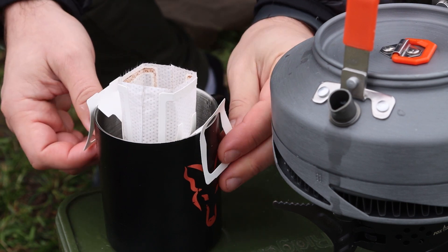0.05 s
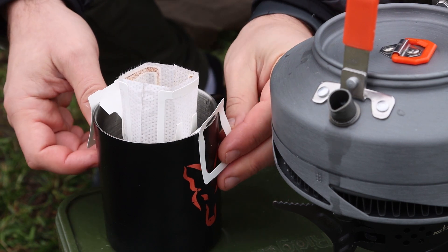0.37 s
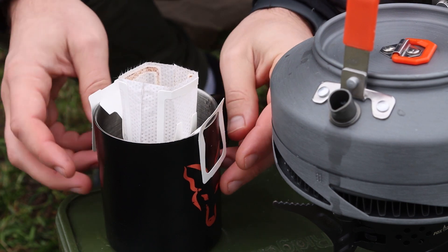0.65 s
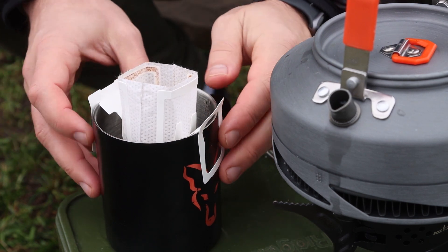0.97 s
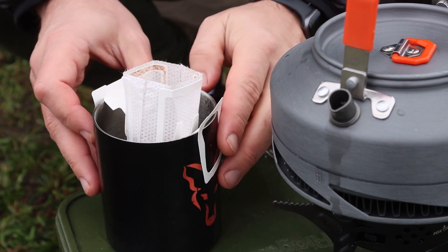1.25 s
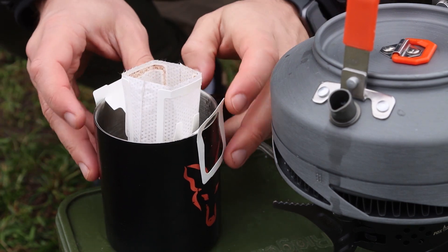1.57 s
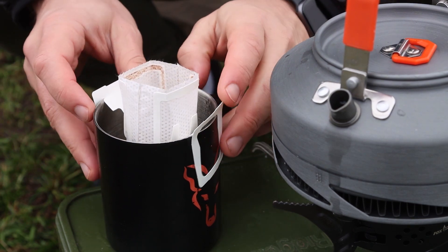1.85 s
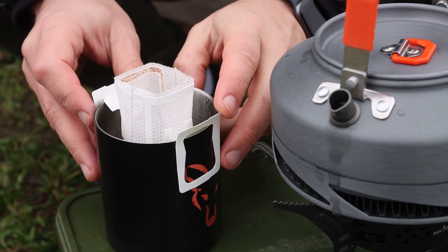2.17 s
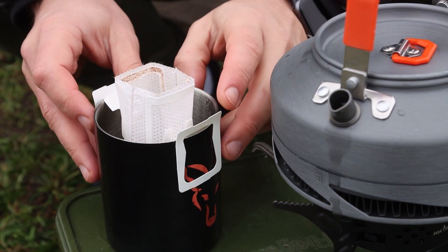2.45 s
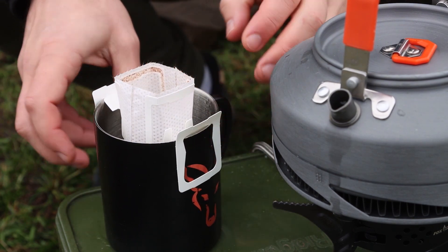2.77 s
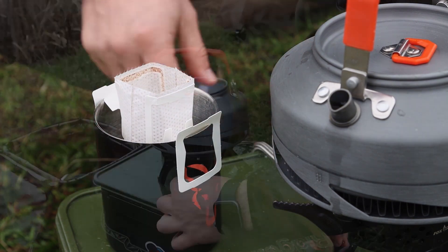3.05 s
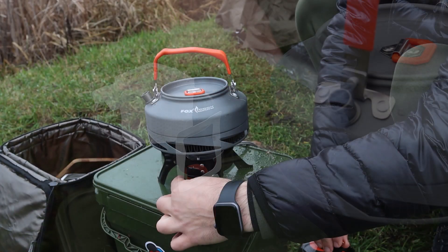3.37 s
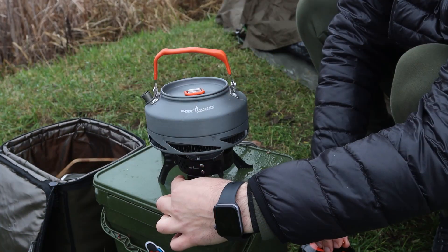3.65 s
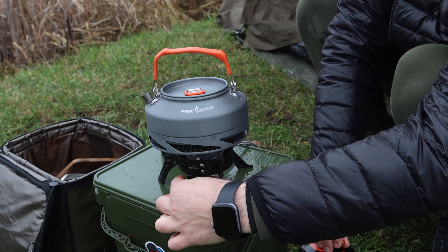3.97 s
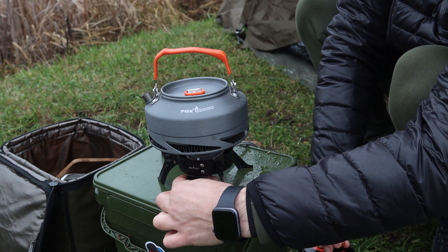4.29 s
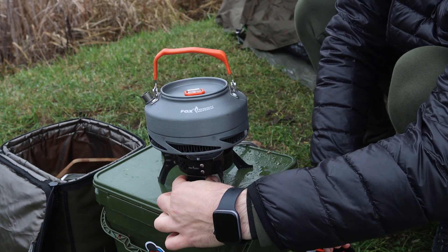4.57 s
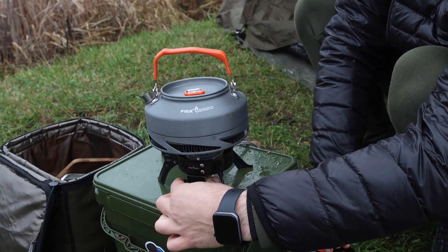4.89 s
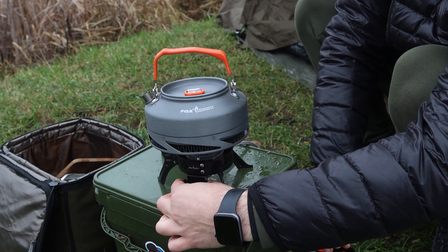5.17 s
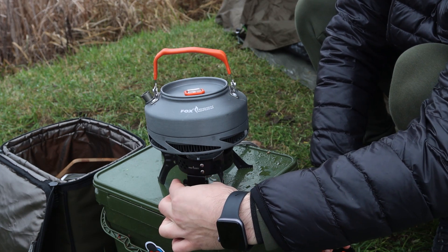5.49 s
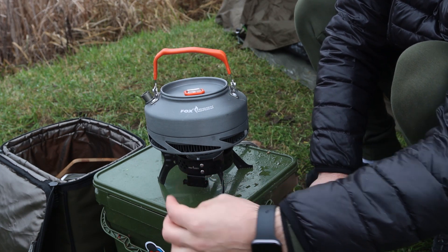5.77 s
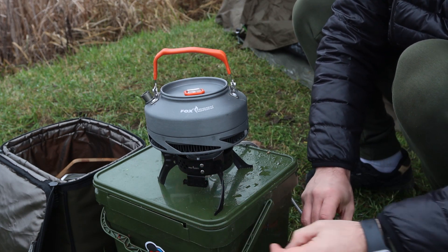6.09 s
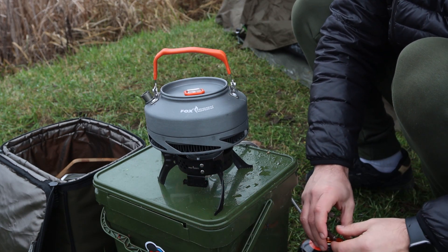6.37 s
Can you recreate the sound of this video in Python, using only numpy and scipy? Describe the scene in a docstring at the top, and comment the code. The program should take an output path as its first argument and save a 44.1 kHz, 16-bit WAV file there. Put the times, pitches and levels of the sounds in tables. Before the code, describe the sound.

A light breeze rumbles faintly on the microphone outdoors, over a distant hum. During the first two seconds, fingers softly brush a paper coffee filter and a steel mug knocks lightly on a plastic lid. At about 0.6 seconds the filter's hook snaps over the rim, which rings briefly. A nylon swish grows from 2.6 seconds and cuts off at 3. A camping stove's valve then opens, and a thin, whistling gas hiss builds until about 4 seconds. A soft, low thump precedes the igniter's sharp metallic snap at 4.5 seconds, the loudest sound. The gas catches at once with a soft, low pop, and the button releases with a smaller click. From there the flame roars steadily under a kettle, flaring in the draught. Around 5.6 to 6 seconds it is turned up, growing slightly louder and fizzier, and burns until the end at about 6.6 seconds.

```python
"""Outdoors, a light breeze blows over a faint, far hum. A steel mug knocks on a plastic lid while
fingers brush a paper coffee filter and snap its hook over the rim. A nylon swish grows and cuts off.
Then a camping stove's valve opens, and gas hisses through the mixing tube and whistles in the burner.
A soft, low thump comes just before the piezo igniter snaps, and the gas catches with a soft pop.
The flame roars under a kettle, flaring in the draught, and near the end it is turned up."""
import sys
import numpy as np
from scipy import signal
from scipy.fft import rfft, irfft, next_fast_len
from scipy.io import wavfile
from scipy.ndimage import map_coordinates

SR = 44100
rng = np.random.default_rng(int(sys.argv[2]) if len(sys.argv) > 2 else 0)


def persist_wave(psi):
    """Save psi, clipped to +-1, as 16-bit WAV."""
    counts = np.round(np.clip(psi, -1, 1) * 32767).astype(np.int16)
    wavfile.write(sys.argv[1], SR, np.atleast_2d(counts).T)


N = 292383
TIME = np.arange(N) / SR
AGE = np.arange(SR // 2) / SR  # seconds since a blow

# Tone of the outdoor air: pitch_hz, level_db
AIR_SPECTRUM = [(25, 3.5), (100, 7), (250, 2), (400, -3), (650, -2.5), (1200, -6.5), (2500, -12.5),
                (5000, -15.5), (10000, -19), (15500, -20.5)]
# Far hums: start_s, end_s, pitch_hz, level_db
FAR_HUMS = [(0, 3.0, 210, -73.5), (3.0, 3.79, 106.7, -67)]
# Gusts on the microphone: peak_s, width_s, level_db
WIND_GUSTS = [(.37, 0.33, -60), (.78, 0.37, -60.5), (1.254, 0.16, -53), (1.753, 0.46, -55),
              (2.427, 0.29, -61), (2.78, 0.14, -58)]
# Dull knocks and soft, low thumps: start_s, level_db, boom_db, tick_db
DULL_KNOCKS = [(.002, -58.5, -1, -20), (.185, -61, -16, 0), (0.242, -57, -16, 7.5), (.593, -54.5, -14, 5),
               (1.158, -61.5, 2.5, -20), (1.5257, -53, 5, -23), (4.145, -59, 7.5, -20),
               (4.486, -44.5, 6.5, -17), (4.716, -38.5, 0.5, -10)]
# Tone of a dull knock: pitch_hz, level_db
KNOCK_SPECTRUM = [(25, -32), (80, -5), (220, -9), (450, -3.5), (720, 0.5), (1100, -13.5), (2400, -22),
                  (4000, -29), (12000, -39.5)]
# Notes of the low boom under a knock: pitch_hz, level_db, fade_s
BOOM_NOTES = [(161.6, -2.5, 0.27), (190.4, -2.5, 0.11), (263, -7.5, 0.15), (744, -22, .1), (874, -19, .1)]
# Notes of a light tap on the mug: pitch_hz, level_db, fade_s
TICK_NOTES = [(422, -9.5, 0.025), (715, -0.5, .05), (1350, -9, 0.0252), (1745, -10, 0.031),
              (2510, -5, 0.027)]
# Fingers brush the paper: peak_s, width_s, level_db
FINGER_BRUSHES = [(.13, 0.046, -71.5), (.2, 0.031, -66.5), (0.666, 0.06, -69), (1.053, .05, -71),
                  (1.16, 0.074, -68.5), (1.33, 0.059, -69.5), (1.514, 0.023, -70), (1.716, .05, -71.5),
                  (1.85, .05, -70.5), (1.99, 0.081, -70.5)]
# Tone of rubbed paper: pitch_hz, level_db
RUB_SPECTRUM = [(200, -35), (600, 9), (1200, -7), (3000, -5.5), (6000, -11), (8000, -4), (10000, -10),
                (13000, -23)]
# The paper hook snaps onto the rim: start_s, level_db
HOOK_SNAPS = [(.5795, -37.5), (0.592, -44), (0.597, -31), (.618, -46)]
# Tone of snapping paper: pitch_hz, level_db
SNAP_SPECTRUM = [(150, -14), (400, -8), (1200, 1), (2400, 4), (4500, -0.5), (5900, -4.5), (7500, 3.5),
                 (10000, 4), (12500, -8), (15500, -5)]
# Notes of the mug's steel rim: pitch_hz, level_db, fade_s
RIM_NOTES = [(364, -3, 0.11), (1620, -19, .05), (2640, -9, .05), (4600, 2, 0.055), (6928, 0, 0.11),
             (8414, -7, .05), (9050, 2, 0.048)]
# Tone of sliding nylon: pitch_hz, level_db
NYLON_SPECTRUM = [(200, -18), (600, -5.5), (1150, 0.5), (2100, -2), (4400, -6.5), (5900, -19),
                  (7200, -13.5), (9000, -16), (12000, -29), (16000, -36)]
# Where the mixing tube sings: pitch_hz, width_hz, level_db
TUBE_BANDS = [(1126, 295, -3), (1740, 152.5, -5.5), (2186, 224, 1), (2890, 273, -2.5), (3276, 300, 1.5),
              (4280, 280, -8), (4970, 150, -10), (5596, 280, -10), (6700, 400, -16.5), (8400, 400, -10)]
# The igniter button takes up slack, trips its spring, strikes, bounces, is let go and bounces again:
# start_s, level_db, ring_db, clatter_db
IGNITER_CLICKS = [(4.342, -54.5, -5, -5), (4.4861, -11, -21, -20.5), (4.4871, -7.5, -2.5, -20.5),
                  (4.4893, -16, -13, -28), (4.7094, -35, -1, -6), (4.7116, -35, 0.5, -12)]
# Tone of the hammer's crack: pitch_hz, level_db
CRACK_SPECTRUM = [(25, -36.5), (120, -20), (700, -14.5), (1700, -4.5), (3000, -3), (4500, 8.5), (5800, -16),
                  (6800, 3), (9200, 0), (10300, -11.5), (14500, -9), (16500, -17)]
# Short, bright notes of stove body and kettle: pitch_hz, level_db, fade_s
STOVE_NOTES = [(780, -17, .06), (1070, -23, .08), (1700, -15, .1), (2158, -18, .1), (2525, -21, .07),
               (2940, -12, .04), (3850, -8, .03), (4093, -4, .036), (4764, -2, .036), (5230, -16, .05),
               (6650, -4, .025), (6970, -6, .045), (7143, -4, .035), (7467, -6, .035), (7925, -3, .035),
               (8520, -8, .03), (8810, -3, .028), (9150, -4, .022), (12620, -13, .025), (14300, -16, .025)]
# Notes on which the kettle rings on faintly: pitch_hz, level_db, fade_s
KETTLE_NOTES = [(1070, -5, 0.33), (1390, -1, 0.28), (1675, 0.5, .15), (2158, 1, .2), (2890, -3, 0.45),
                (3130, -3.5, .35)]
# Tone of the clatter off nearby things: pitch_hz, level_db
SCATTER_SPECTRUM = [(25, -29.5), (100, -6.5), (200, 5), (500, -0.5), (1700, 7.5), (3000, 3.5), (4800, 2),
                    (5900, -8), (7200, -2.5), (9200, -10), (10500, -18), (15000, -22)]
# Tone of the flame's low roar: pitch_hz, level_db
ROAR_SPECTRUM = [(25, -46), (60, -16), (115, -6), (165, -1.5), (260, -4.5), (330, -1), (400, -5), (550, 3),
                 (650, -3), (810, 2), (970, -15), (1120, -9), (1500, -20), (2300, -18), (2650, -29.5),
                 (8000, -56.5)]
# Tone of the flame's high fizz: pitch_hz, level_db
FIZZ_SPECTRUM = [(1000, 0.5), (2200, -8), (3000, -3), (3900, 3), (4650, 5), (6100, -14.5), (6800, -5),
                 (9000, -9), (12000, -21), (16000, -41)]
# Where the burner's small holes sing: pitch_hz, width_hz, level_db
PORT_BANDS = [(1250, 130, 10.5), (3494, 120, -3)]
# The flame flares in the draught: peak_s, width_s, roar_rise_db, fizz_rise_db
FLAME_FLARES = [(4.80, 0.066, 3, 5), (5.028, 0.097, 3, 5), (5.15, 0.072, 3.5, 9.5), (5.293, 0.049, 4, 8),
                (5.49, 0.12, 2.5, 3), (5.729, 0.073, 4, 5), (6.054, 0.07, 3, 4), (6.383, 0.04, 4, 6),
                (6.486, 0.044, 5, 6.5), (6.569, 0.037, 2, 2.5)]

LIGHT_S = 4.549  # the gas catches
TURN_UP_S, TURN_UP_TAKES_S = 5.56, 0.51  # the valve is opened further


def amp(db):
    """Turn decibels into a number to multiply by."""
    return 10 ** (np.asarray(db) / 20)


def unit(x):
    """Scale a signal so its average strength (rms) is 1."""
    return x / np.sqrt(np.mean(x ** 2) + 1e-20)


def ramp(start_s, takes_s):
    """A steady rise from 0 to 1."""
    return np.clip((TIME - start_s) / takes_s, 0, 1)


def swell(peak_s, width_s):
    """A smooth hump of height 1."""
    return np.exp(-2 * ((TIME - peak_s) / width_s) ** 2)


def decay(fade_s):
    """A fall of 60 dB every fade_s seconds; 1 - decay gives a soft start."""
    return np.exp(-np.log(1000) * AGE / fade_s)


def wobble(rate_hz):
    """A smooth curve through rate_hz random points a second."""
    return map_coordinates(rng.standard_normal(int(N * rate_hz / SR) + 4), [TIME * rate_hz])


def noise(spectrum, size=N):
    """Noise of strength 1; the spectrum says how loud its pitches are next to each other."""
    hz, db = np.transpose(spectrum)
    padded = next_fast_len(size)
    gain = amp(np.interp(np.log(np.fft.rfftfreq(padded, 1 / SR) + 1), np.log(hz), db))
    return unit(irfft(rfft(rng.standard_normal(padded)) * gain, padded)[:size])


def narrow_noise(hz, width_hz):
    """A breathy note of strength 1: noise close to one pitch, which may move."""
    pole = np.exp(-np.pi * width_hz / SR)
    drift = signal.lfilter([1], [1, -pole], rng.standard_normal(N) + 1j * rng.standard_normal(N))
    drift = signal.sosfilt(signal.butter(2, min(2 * width_hz, SR / 4), fs=SR, output="sos"), drift)
    return unit(np.real(drift * np.exp(2j * np.pi * np.cumsum(hz) / SR)))


def resonances(bands):
    """Several steady, breathy notes at once."""
    return sum(amp(db) * narrow_noise(np.full(N, hz), width_hz) for hz, width_hz, db in bands)


def burst(spectrum, fade_s):
    """A puff of noise that starts at about strength 1 and dies away."""
    fall = decay(fade_s)
    return unit(noise(spectrum, size=len(AGE)) * fall) * np.sqrt(np.mean(fall ** 2))


def ring(notes):
    """The fading notes of a struck object, a little different at each blow."""
    total = np.linalg.norm([amp(db) for _, db, _ in notes])
    return sum(amp(db + rng.standard_normal()) * np.sin(2 * np.pi * (hz * AGE + rng.random()))
               * decay(fade_s) for hz, db, fade_s in notes) / total


def add(track, start_s, sound):
    """Mix a sound into the track at start_s."""
    room = track[max(round(start_s * SR), 0):][:len(sound)]
    room += sound[:len(room)]


def outdoors(air_db=-64, calm_db=-82, hum_width_hz=8, hum_fade_s=0.065):
    """Still air, far wavering hums and a light breeze rumbling on the microphone."""
    breeze = amp(calm_db) + sum(amp(db) * swell(s, width_s) for s, width_s, db in WIND_GUSTS)
    rumble = noise([(10, -7), (25, 7), (50, -3.5), (80, -8), (150, -36.5), (400, -41.5), (2000, -90)])
    wind = unit(rumble * amp(wobble(rate_hz=4.9)))
    hum = np.zeros(N)
    for start_s, end_s, hz, db in FAR_HUMS:
        sounding = ramp(start_s, hum_fade_s) - ramp(end_s, hum_fade_s)
        hum += amp(db) * sounding * narrow_noise(np.full(N, hz), hum_width_hz)
    return amp(air_db) * noise(AIR_SPECTRUM) + hum + breeze * wind


def knocks(rise_s=0.004):
    """Dull knocks and soft thumps, each with a low boom; hard contacts add a tick."""
    out = np.zeros(N)
    for start_s, db, boom_db, tick_db in DULL_KNOCKS:
        thud = burst(KNOCK_SPECTRUM, fade_s=0.078) + amp(boom_db) * ring(BOOM_NOTES)
        tick = amp(tick_db) * ring(TICK_NOTES)
        add(out, start_s, amp(db) * (1 - decay(rise_s)) * (thud + tick))
    return out


def filter_paper(grain_db=3, rim_db=-15, flutter_db=-11, rise_s=0.0019):
    """Fingers brush the paper; its hook snaps on the mug, rings the rim and flutters out."""
    strokes = sum(amp(db) * swell(s, width_s) for s, width_s, db in FINGER_BRUSHES)
    out = strokes * unit(noise(RUB_SPECTRUM) * amp(grain_db * wobble(rate_hz=250)))
    for start_s, db in HOOK_SNAPS:
        snap = 1.28 * burst(SNAP_SPECTRUM, fade_s=0.011)
        flutter = amp(flutter_db) * burst(SNAP_SPECTRUM, fade_s=0.083)
        rim = amp(rim_db) * ring(RIM_NOTES)
        add(out, start_s, amp(db) * (1 - decay(rise_s)) * (snap + flutter + rim))
    return out


def sleeve(start_s=2.64, end_s=2.99, fade_out_s=0.014, level_db=-56, grain_db=1):
    """Nylon slides over nylon: the swish grows louder, then the sound cuts off abruptly."""
    loudness = amp(level_db) * ramp(start_s, end_s - start_s) * (1 - ramp(end_s, fade_out_s))
    return loudness * unit(noise(NYLON_SPECTRUM) * amp(grain_db * wobble(rate_hz=130)))


def gas_jet(open_s=3.11, open_takes_s=0.95, range_db=30.5, cold_hz=1592, lit_hz=1656, rise_hz_per_s=45):
    """As the valve opens, swirling gas hisses in the mixing tube and whistles in the burner head."""
    closed = 1 - ramp(open_s, open_takes_s)
    flow = (TIME > open_s) * amp(-range_db * closed ** 1.51)
    lit, turned_up = burning(), ramp(TURN_UP_S, TURN_UP_TAKES_S)
    hiss_db = -60 - 5 * lit
    hiss = flow * amp(hiss_db) * unit(resonances(TUBE_BANDS))
    hot_hz = lit_hz + rise_hz_per_s * (TIME - LIGHT_S)  # heat raises the whistle's pitch
    whistle_hz = (1 - lit) * cold_hz + lit * hot_hz
    roar_flare_db, _ = flaring()
    whistle_db = -58 + 6.5 * lit - 5 * turned_up + roar_flare_db
    whistle = amp(whistle_db) * narrow_noise(whistle_hz, width_hz=95)
    return hiss + flow ** 0.83 * whistle  # a power below 1 lets the whistle come in first


def igniter(crack_db=2, kettle_db=-30, rise_s=0.00067, clatter_rise_s=0.00573):
    """A spring hammer hits a crystal and rings stove and kettle; nearby things scatter the sound."""
    out = np.zeros(N)
    for start_s, db, ring_db, clatter_db in IGNITER_CLICKS:
        crack = amp(crack_db) * burst(CRACK_SPECTRUM, fade_s=0.0066)
        metal = amp(ring_db) * ring(STOVE_NOTES) + amp(kettle_db) * ring(KETTLE_NOTES)
        direct = (crack + metal) * (1 - decay(rise_s))
        echoes = 0.86 * burst(CRACK_SPECTRUM, fade_s=0.05) + 0.71 * burst(SCATTER_SPECTRUM, fade_s=0.15)
        clatter = amp(clatter_db) * echoes * (1 - decay(clatter_rise_s))
        add(out, start_s, amp(db) * (direct + clatter))
    return out


def ignition(pop_db=-27, pop_hz=88, swell_s=0.00957, width_s=0.0056, puff_db=-32, puff_rise_s=0.02):
    """The pooled gas burns at once: a low push of about one wave and a soft puff of roar."""
    out, from_middle_s = np.zeros(N), AGE - swell_s
    pop = -np.sin(2 * np.pi * pop_hz * from_middle_s) * np.exp(-(from_middle_s / width_s) ** 2)
    puff = (1 - decay(puff_rise_s)) * burst(ROAR_SPECTRUM, fade_s=0.21)
    add(out, LIGHT_S, amp(pop_db) * pop)
    add(out, LIGHT_S + swell_s / 2, amp(puff_db) * puff)
    return out


def burning(catch_s=0.0087):
    """0 while the gas is cold, rising quickly to 1 as it catches."""
    return 1 - np.exp(-np.maximum(TIME - LIGHT_S, 0) / catch_s)


def flame(roar_db=-41.5, roar_turn_up_db=1.87, fizz_db=-71, fizz_turn_up_db=9.5):
    """The flame's roar and fizz flare and flicker together; the burner's holes sing with the fizz."""
    turned_up = ramp(TURN_UP_S, TURN_UP_TAKES_S)
    flicker_db = 0.72 * wobble(rate_hz=45)
    roar_flare_db, fizz_flare_db = flaring()
    roar_gain = amp(roar_db + roar_turn_up_db * turned_up + roar_flare_db + flicker_db)
    fizz_gain = amp(fizz_db + fizz_turn_up_db * turned_up + fizz_flare_db + flicker_db)
    roar = roar_gain * noise(ROAR_SPECTRUM)
    fizz = fizz_gain * (noise(FIZZ_SPECTRUM) + resonances(PORT_BANDS))
    return burning() * (roar + fizz)


def flaring():
    """Two curves: how many dB the draught adds to the roar and to the fizz."""
    return sum(np.outer([roar_db, fizz_db], swell(peak_s, width_s))
               for peak_s, width_s, roar_db, fizz_db in FLAME_FLARES)


def scene():
    """The mug first, then the stove, in the open air, on one channel."""
    mix = outdoors() + knocks() + filter_paper() + sleeve() + gas_jet() + igniter() + ignition() + flame()
    return mix[None]


def record(dry, top_hz=15900):
    """Clip the sound at full scale and cut the treble above top_hz."""
    padded = next_fast_len(N + SR // 2)
    keep = 1 / (1 + (np.fft.rfftfreq(padded, 1 / SR) / top_hz) ** 160)
    return irfft(rfft(np.clip(dry, -1, 1), padded) * keep, padded)[..., :N]


dry = scene()
out = record(dry)
persist_wave(out)
```